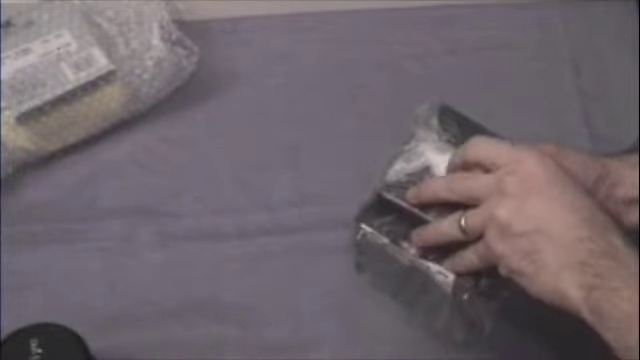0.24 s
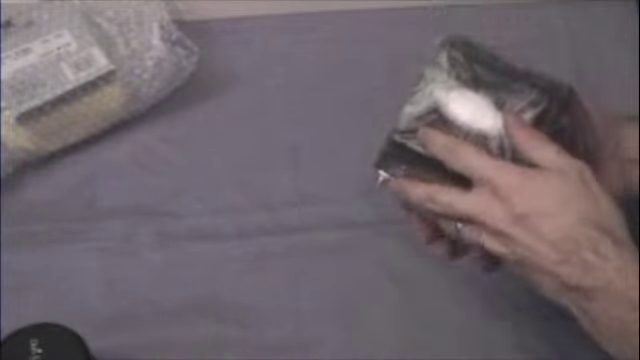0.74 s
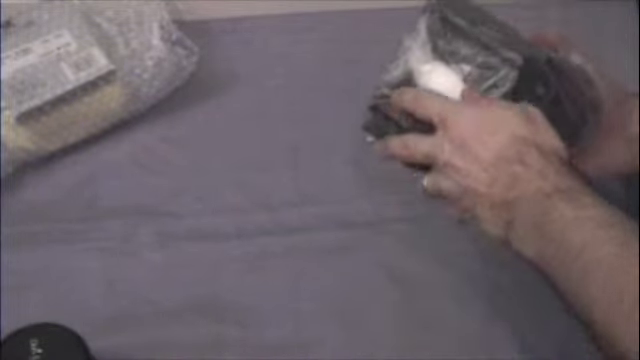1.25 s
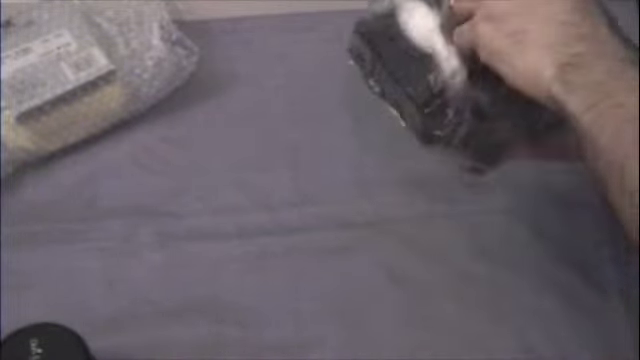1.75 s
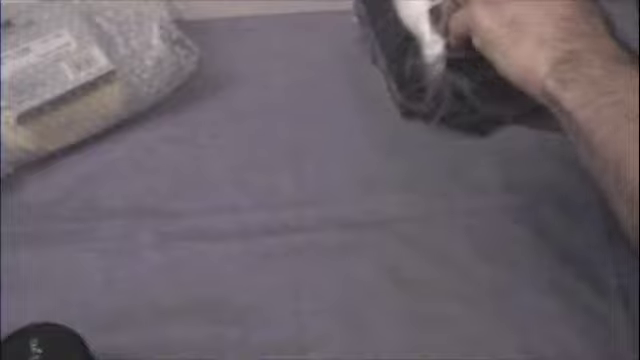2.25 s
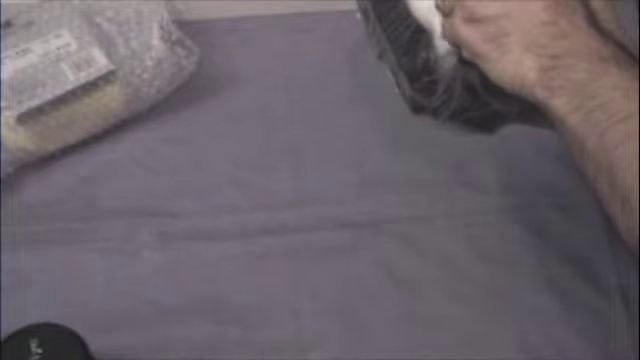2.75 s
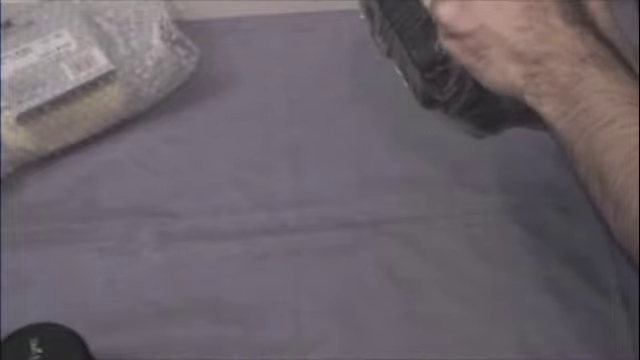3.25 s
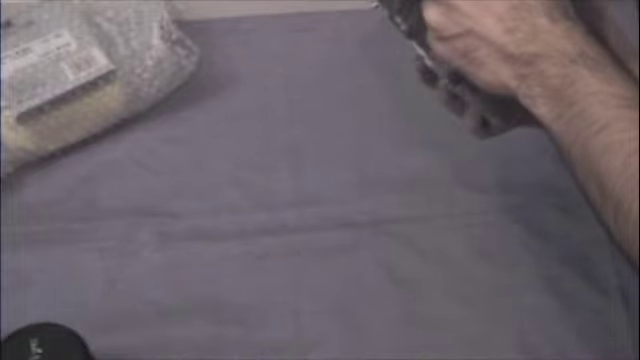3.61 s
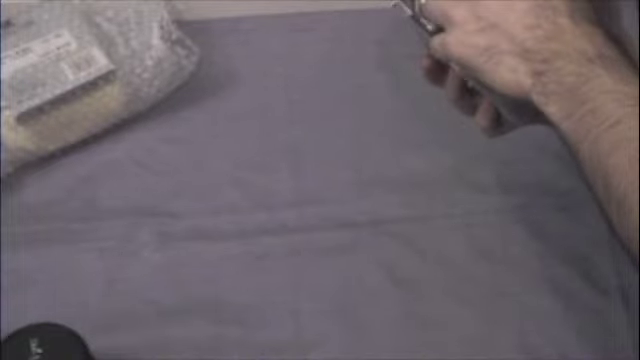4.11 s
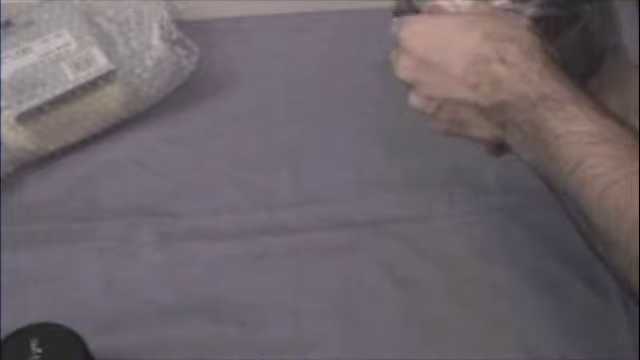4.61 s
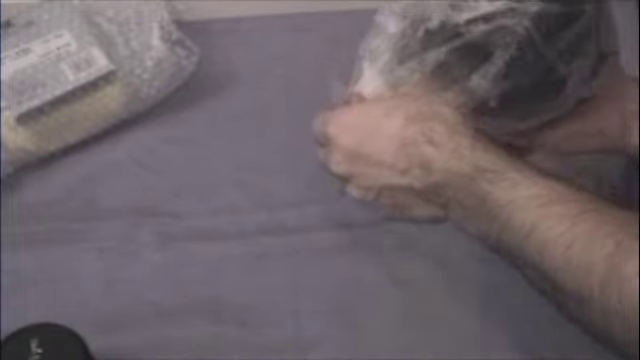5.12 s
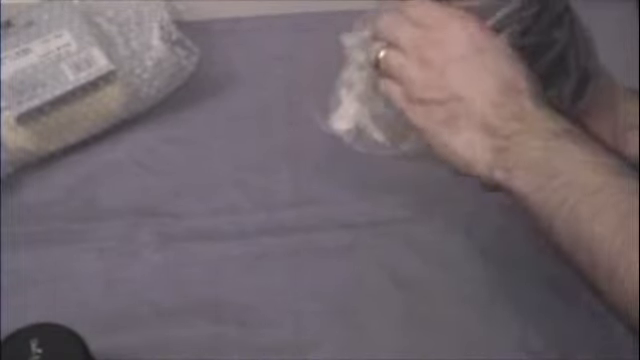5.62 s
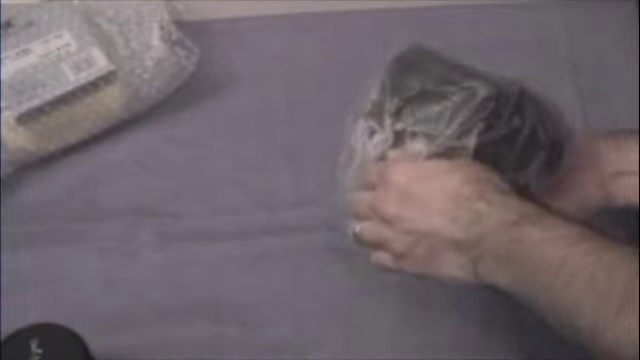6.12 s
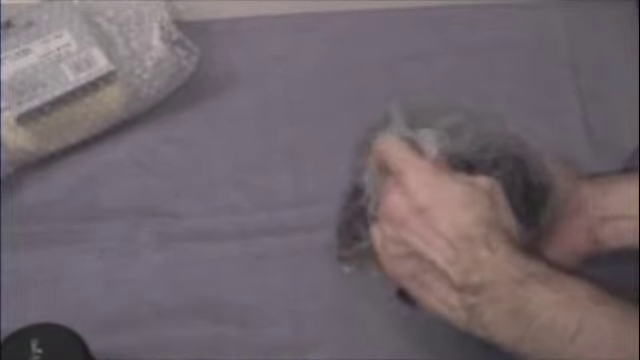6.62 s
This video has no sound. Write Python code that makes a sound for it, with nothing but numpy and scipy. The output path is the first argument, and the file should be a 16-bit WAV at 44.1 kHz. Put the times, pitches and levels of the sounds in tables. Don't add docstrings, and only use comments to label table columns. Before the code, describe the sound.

A quiet small room, heard through a stereo camera microphone with constant soft low motor hum, hiss and a very faint thin high whistle. From 0 to about 1.5 seconds a thin plastic bag is turned in the hands: crisp bursts of dense tiny clicks, dull rustling of larger panels, small hollow taps on the stiff pack and bright separate snaps. From 1.5 it thins out, and from 2 to 3.35 only faint picking, sparse ticks and light taps remain. At 3.4 the seal tears in a sudden, very loud cluster of sharp cracks with a hollow knock. Crackling continues to 3.8, nearly rests, then resumes at 4.15 and swells into dense, loud crinkling from 4.8 to 5.3. A lull with small ticks follows until 5.7, then vigorous crackling builds again, with strong snaps and knocks near 6.5 and a sharp snap near 6.85, continuing to the end at about 7.

```python
import sys
import numpy as np
from scipy import signal
from scipy.fft import rfft, irfft
from scipy.io import wavfile
from scipy.ndimage import uniform_filter1d

SR = 44100
rng = np.random.default_rng(int(sys.argv[2]) if len(sys.argv) > 2 else 0)


def invert_db(x):
    u = np.asarray(x, float) / 20
    return 10 ** u


def file_out(sig):
    cols = np.atleast_2d(sig).T
    lim = np.clip(cols, -1, 1)
    pcm = np.round(lim * 32767).astype(np.int16)
    wavfile.write(sys.argv[1], SR, pcm)


N = 302526

# pitch_hz, width_hz, level_db (rms)
MOTOR_HUM = [
    (54.6, 6.1, -67.5),
    (121.1, 6.8, -68.5),
    (152.5, 12.4, -68),
    (210.5, 14.5, -66.5),
    (254.1, 28.5, -56.5),
    (337.5, 9.6, -66.5),
]
# pitch_hz, level_db (per Hz)
HISS_TONE = [(20, -14.5), (60, -19), (250, -11), (340, -16), (500, -23), (570, -13), (750, -16.5),
             (1210, -21.5), (1900, -20.5), (3000, -26.5), (3760, -13.5), (4320, -23), (6950, -28),
             (15700, -29.5)]
# pitch_hz, left_lead_radians
PORT_TURN = [(300, 0.0), (6000, -.1), (7000, -.3), (8000, -.85), (10500, -3.14), (12000, -4.6),
             (13200, -5.3), (16000, -6.2)]
# pitch_hz, left_minus_right_db
PORT_LEAN = [(60, 1.5), (110, 1.0), (200, 9), (380, 2), (700, 1.5), (1290, 1), (2380, -1), (4400, 2),
             (8120, -1), (15000, -7.5)]
# pitch_hz, level_db (per Hz)
FILM_TONE = [(250, -26), (700, -18.5), (1500, -9), (2500, -4.5), (3500, 0.5), (3900, -3), (4250, -8),
             (5500, -4), (7000, -2), (8200, -6.5), (10200, -12.5), (12000, -15), (14200, -30.5),
             (15600, -46)]
# pitch_hz, level_db (per Hz)
PANEL_TONE = [(200, -7), (400, -10.5), (650, -0.5), (900, -4.5), (1300, 0.5), (1800, -8.5), (3000, -28.5)]
# start_s, length_s, first_level_db, last_level_db
CLOSED_GRIPS = [(0.0, .21, -37, -45), (.24, 0.13, -40, -47), (.43, 0.13, -55.5, -36.5),
                (.545, 0.14, -35.5, -37), (.73, 0.041, -39, -43.5), (.8, 0.24, -36, -39.5),
                (1.06, 0.29, -37.5, -38), (1.33, 0.26, -40.5, -50.5), (1.63, 0.13, -50.5, -47),
                (1.855, 0.13, -44.5, -51.5), (2.0, .1, -56, -55), (2.145, .09, -50.5, -53.5),
                (2.24, .15, -57.5, -49.5), (2.56, 0.096, -53.5, -52), (2.67, 0.12, -47, -48.5),
                (2.815, 0.058, -49, -46.5), (2.92, 0.06, -46, -47.5), (3.12, 0.052, -50, -48),
                (3.26, .08, -60, -54), (3.35, .05, -51, -46)]
# start_s, length_s, first_level_db, last_level_db
OPEN_GRIPS = [(3.41, 0.22, -42, -47.5), (3.6, 0.19, -44, -38), (4.13, .02, -52, -44),
              (4.153, 0.19, -38, -35.5), (4.36, 0.17, -34.5, -38), (4.55, 0.078, -36, -33),
              (4.7, .08, -39, -36.5), (4.785, 0.11, -32, -26.5), (4.9, 0.17, -30.5, -29),
              (5.1, 0.099, -30, -26.5), (5.3, 0.015, -31.5, -33), (5.703, 0.31, -43.5, -32),
              (6.0, 0.2, -32, -39.5), (6.18, 0.44, -35.5, -28), (6.62, 0.53, -31, -31)]
# start_s, peak_db, pitch_hz
TAPS = [(0.043, -37.5, 716), (0.249, -39.5, 646), (0.372, -40, 1250), (0.545, -33.5, 796),
        (0.593, -42, 720), (0.677, -35.5, 680), (0.787, -32, 687), (0.937, -45, 1120), (1.107, -40, 1480),
        (1.305, -34.5, 1190), (1.4, -40, 1260), (1.979, -48, 630), (2.211, -55, 1270), (2.323, -44.5, 1160),
        (2.712, -47.5, 990), (2.76, -44, 730), (3.202, -46, 1500), (3.401, -35, 1440), (3.404, -30, 737),
        (3.418, -36, 890), (3.783, -39, 1270), (4.152, -33, 1330), (4.568, -41, 1310), (5.12, -51, 1200),
        (5.153, -39, 1220), (5.304, -37, 1480), (6.067, -39, 1330), (6.36, -31, 1270), (6.593, -27, 1290),
        (6.602, -28, 1280)]
# start_s, peak_db, pitch_hz, burst_db
CLOSED_SNAPS = [(0.1427, -24, 6600, -25), (0.208, -28, 3500, -14), (0.2297, -21.5, 5200, -17),
                (0.2505, -31.5, 2660, -2), (0.2865, -29.5, 3550, -3.5), (0.3379, -34, 3600, -25),
                (0.3775, -17.5, 6850, -31), (0.4342, -30, 7160, -8), (0.4455, -29, 3250, -23),
                (0.4877, -44, 3700, -20), (0.5482, -25.5, 3650, 0), (0.5943, -34, 1190, -18),
                (0.6529, -20, 6900, -29), (0.6774, -21, 7000, -6), (0.7361, -32.5, 3150, -1),
                (0.7818, -23, 3120, 2), (0.7855, -21.5, 6670, 2.5), (1.062, -42, 3520, -12),
                (1.1637, -27, 3880, -4), (1.2089, -19.5, 7000, -23), (1.3655, -36, 3400, -25),
                (1.5194, -28, 6500, -13), (1.6778, -44, 2700, -9), (1.7098, -39, 2600, -8),
                (1.747, -30, 7100, -18), (1.7758, -30, 6250, -11.5), (1.8536, -46, 3400, -16),
                (1.861, -21.5, 6650, -38), (1.9325, -41, 3620, -23),
                (2.0275, -27, 4900, -17), (2.0704, -35, 6800, -10), (2.1468, -36, 7100, -6),
                 (2.1578, -26.5, 6000, -23), (2.1849, -33, 7200, -16), (2.2127, -29.5, 7250, -9),
                 (2.28, -38, 5200, -4), (2.3254, -31.5, 3900, -9), (2.3606, -40, 3200, -7),
                 (2.5039, -41, 4000, -15), (2.5717, -35.5, 3170, -6.5), (2.6782, -35, 6500, -9),
                 (2.709, -35, 3300, 0), (2.81, -32.5, 7000, -4), (2.8173, -17, 6250, -12.5),
                 (2.917, -40, 3700, -6), (2.9339, -24.5, 6660, -18), (2.9885, -30, 6600, -8.5),
                 (3.0254, -32.5, 5200, -8.5), (3.079, -34, 6600, -28), (3.1392, -35, 6600, -2.5),
                 (3.148, -26, 7000, -28), (3.2041, -32, 6900, -7.5), (3.2724, -37.5, 3240, -3.5),
                 (3.3533, -44, 3400, -3), (3.3829, -31, 7300, -16)]
# start_s, peak_db, pitch_hz, burst_db
SEAL_SNAPS = [
    (3.3945, -4, 4300, -18),
    (3.3963, -8, 6500, -16),
    (3.3989, -3, 3300, -18),
    (3.4022, -5, 3400, -16),
    (3.4058, -7, 4800, -15),
    (3.409, -10, 3400, -16),
    (3.4135, -12, 3500, -13),
]
# start_s, peak_db, pitch_hz, burst_db
PULLING_SNAPS = [(3.514, -29, 7400, -15), (3.6147, -27, 3400, -17), (3.669, -32, 3300, -1),
                 (3.708, -23, 3500, -6), (3.7172, -21, 6200, -25), (3.7408, -29, 6600, -1.5),
                 (3.7745, -24.5, 3180, -1), (4.065, -39.5, 6400, -11), (6.199, -33, 3620, -17),
                 (4.157, -32, 1590, -16), (4.1962, -29.5, 2800, -2.5), (4.3667, -20, 5240, -20),
                 (4.4262, -17.5, 3780, -23), (4.5707, -22.5, 3520, -5), (4.5904, -18, 3200, -6),
                 (4.7884, -20, 3180, -15), (5.3005, -26, 3400, -1), (5.307, -25, 3500, 2),
                 (5.576, -34, 2880, -16), (5.606, -35, 3400, -21), (5.6622, -36.5, 3600, -11),
                 (5.7046, -41, 2700, -11), (5.7842, -27.5, 7100, -6), (5.831, -32, 2900, -1),
                 (6.089, -18.5, 6570, -27), (6.4778, -22, 3350, -21), (6.5462, -15, 2800, -13),
                 (6.602, -13, 3480, -16), (6.7834, -19.5, 3680, -6.5), (6.8554, -12, 6800, -22.5)]


def rms_one(x):
    return x / np.sqrt(np.mean(x ** 2) + 1e-20)


def at_hz(points, hz):
    table = np.array(points)
    return np.interp(np.log(hz + 1), np.log(table[:, 0]), table[:, 1])


def response(tone):
    size = 4096
    gain = invert_db(at_hz(tone, np.fft.rfftfreq(size, 1 / SR)))
    cepstrum = irfft(np.log(gain))
    cepstrum[1:size // 2] *= 2
    cepstrum[size // 2 + 1:] = 0
    return irfft(np.exp(rfft(cepstrum)))


def colour(x, tone):
    coloured = signal.fftconvolve(np.atleast_2d(x), response(tone)[None])
    return np.squeeze(coloured[:, :N])


def drift(rate_hz):
    r = np.exp(-2 * np.pi * rate_hz / SR)
    noise = rng.standard_normal(N + SR)
    slow = signal.lfilter([1], [1, -2 * r, r * r], noise)
    return rms_one(slow[SR:])


def ring(x, hz, width_hz):
    r = np.exp(-np.pi * width_hz / SR)
    feed = [(1 - r * r) / 2, 0, (r * r - 1) / 2]
    feedback = [1, -2 * r * np.cos(2 * np.pi * hz / SR), r * r]
    return signal.lfilter(feed, feedback, x + 1e-18)


def camera():
    shake = 1.06 * rng.standard_normal(N) + rng.standard_normal((2, N))
    hum = 0
    for hz, width_hz, level_db in MOTOR_HUM:
        body = ring(ring(shake, hz, width_hz), hz, width_hz)
        hum = hum + invert_db(level_db) * rms_one(body)

    air = rng.standard_normal(N)
    own = rng.standard_normal((2, N))
    dull = signal.lfilter([.25], [1, -.75], own)
    hiss = invert_db(-54.5) * rms_one(colour(air + 2.3 * dull + 1.1 * own, HISS_TONE))

    whistle_hz, whistle_db = 15734, -82
    whistle = invert_db(whistle_db) * np.sqrt(2) * np.sin(2 * np.pi * whistle_hz * np.arange(N) / SR)
    balance = invert_db(np.array([[1.1], [-1.1]]))
    return (hum + hiss) * balance + whistle


def room(x):
    t60_s, rise_s = 0.23, 0.0016
    shared_db, differing_db = -7, -18
    t = np.arange(SR // 2) / SR
    fade = invert_db(-60 * t / t60_s) * (1 - np.exp(-t / rise_s))
    tails = rng.standard_normal((2, len(t))) * fade
    tails /= np.sqrt(np.sum(tails ** 2, axis=1, keepdims=True))
    mid, side = signal.fftconvolve(x[None], tails)[:, :N]
    side = signal.lfilter([.4], [1, -.6], side)
    return invert_db(shared_db) * mid, invert_db(differing_db) * side


def ports(x):
    hz = np.fft.rfftfreq(N, 1 / SR)
    turn = np.exp(.5j * at_hz(PORT_TURN, hz))
    lean = invert_db(at_hz(PORT_LEAN, hz) / 2)
    left_right = np.array([turn * lean, np.conj(turn) / lean])
    return irfft(rfft(x) * left_right, N)


def effort(grips):
    tighten_db_per_s, settle_db_per_s = 900, 142.5
    t = np.arange(N) / SR
    level_db = np.full(N, -120.)
    for start_s, length_s, first_db, last_db in grips:
        held = np.interp(t, [start_s, start_s + max(length_s, .01)], [first_db, last_db])
        before = tighten_db_per_s * np.maximum(start_s - t, 0)
        after = settle_db_per_s * np.maximum(t - start_s - length_s, 0)
        level_db = np.maximum(level_db, held - (before + after))
    return level_db


def knocks():
    out = np.zeros(N + SR)
    t = np.arange(1500) / SR
    chances = rng.standard_normal((len(TAPS), 1500))
    for (start_s, peak_db, hz), chance in zip(TAPS, chances):
        contact = chance * np.exp(-t / 0.0065)
        tap = ring(ring(contact, hz, hz / 7.4), hz, hz / 0.56)
        first = round(start_s * SR)
        out[first:first + 1500] += invert_db(peak_db + 3.5) * tap / np.abs(tap).max()
    return out[:N]


def grains(per_s, spread_db, low_hz, high_hz, sharp):
    sizes = invert_db(spread_db * np.minimum(rng.exponential(1, N), 5)) * rng.choice([-1, 1], N)
    clicks = sizes * (rng.random(N) < per_s / SR)
    patch = rng.integers(0, 16, N)
    pitches = np.geomspace(low_hz, high_hz, num=16)
    return sum(ring(clicks * (patch == k), hz, hz / sharp) for k, hz in enumerate(pitches))


def rustle(level_db):
    per_s = 1500 * invert_db(1.5 * drift(25))
    panels = grains(per_s, 2.36, 290, 2360, sharp=1.84)
    return invert_db(level_db - 3.0) * rms_one(colour(panels, PANEL_TONE))


def crinkle(level_db, bright_db):
    clumps_db = 2.3 * drift(40) + 3.5 * drift(110)
    per_s = 3500 * invert_db(.55 * (level_db + 37) + clumps_db)
    film = colour(grains(per_s, 0.34, 540, 15800, sharp=0.41), FILM_TONE)
    slow_power = uniform_filter1d(uniform_filter1d(film ** 2, size=2600), size=2600)
    film /= np.sqrt(slow_power + 1e-12)
    treble = signal.sosfilt(signal.butter(2, 4600, "high", fs=SR, output="sos"), film)
    return invert_db(level_db) * (film + (invert_db(bright_db) - 1) * treble)


def snaps(rows):
    out = np.zeros(N + SR)
    t = np.arange(3000) / SR
    film = response(FILM_TONE)[:512]
    panel = response(PANEL_TONE)[:512]
    broad = film / np.abs(film).max() + 0.53 * panel
    chances = rng.standard_normal((len(rows), 2, 3000))
    for (start_s, peak_db, hz, burst_db), chance in zip(rows, chances):
        release = chance[1, :40] * np.exp(-t[:40] / .0003)
        crack = signal.fftconvolve(film, release)[:512]
        click = .6 * crack + 3.5 * ring(crack, hz, hz / 4.0)
        click /= np.abs(click).max()

        sparse = np.tanh(chance[0]) * (np.abs(chance[1]) > 1.2)
        shower = sparse * np.exp(-t / 0.0098) * invert_db(min(burst_db, 0) - 2.0)
        snap = signal.fftconvolve(shower, 0.57 * click + 1.73 * broad)
        snap[:512] += click
        first = round(start_s * SR)
        out[first:first + len(snap)] += invert_db(peak_db - .8) * snap
    return out[:N]


def scene():
    closed_db = effort(CLOSED_GRIPS)
    open_db = effort(OPEN_GRIPS)
    rest_db = -58.5
    level_db = np.maximum(np.maximum(closed_db, open_db), rest_db)
    dull_db = np.where(closed_db > open_db, -8.5, -10.5) - 0.025 * (level_db + 40.5)
    bright_db = -1.18 + 0.01 * (level_db + 29)

    bag = knocks() + rustle(level_db + dull_db) + crinkle(level_db - 0.5, bright_db)
    bag = bag + snaps(CLOSED_SNAPS + SEAL_SNAPS + PULLING_SNAPS)
    tail, side = room(bag)
    return ports(bag + tail) + side * [[1], [-1]] + camera()


def band_limit(x):
    return signal.sosfilt(signal.butter(12, 15820, fs=SR, output="sos"), x)


def record(dry):
    return band_limit(dry)


dry = scene()
out = record(dry)
file_out(out)
```